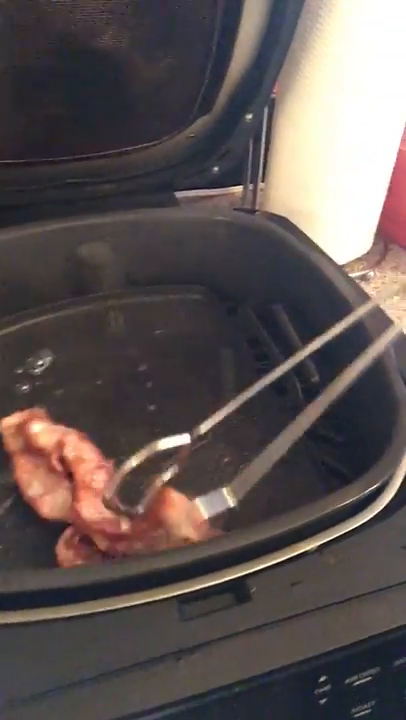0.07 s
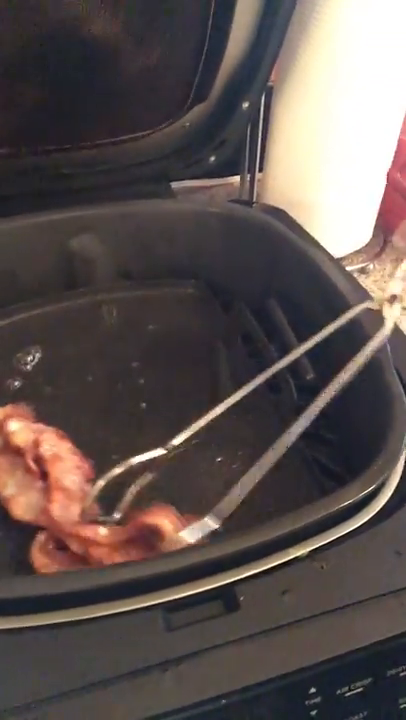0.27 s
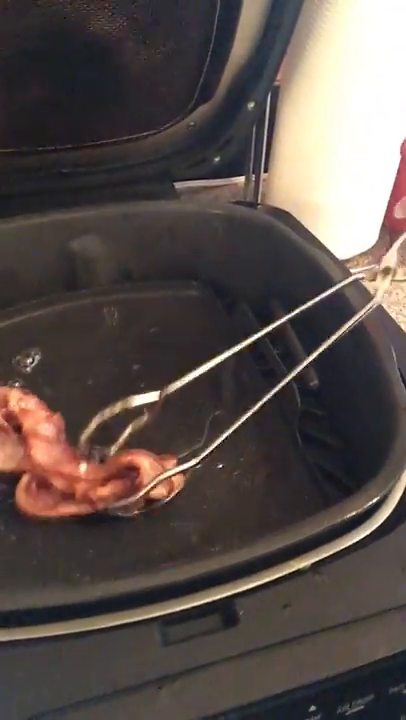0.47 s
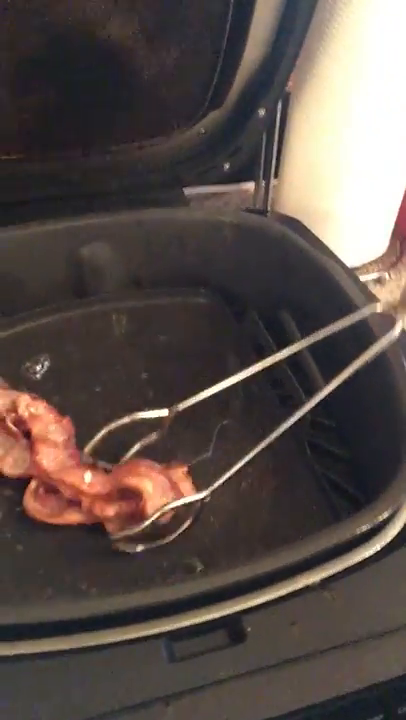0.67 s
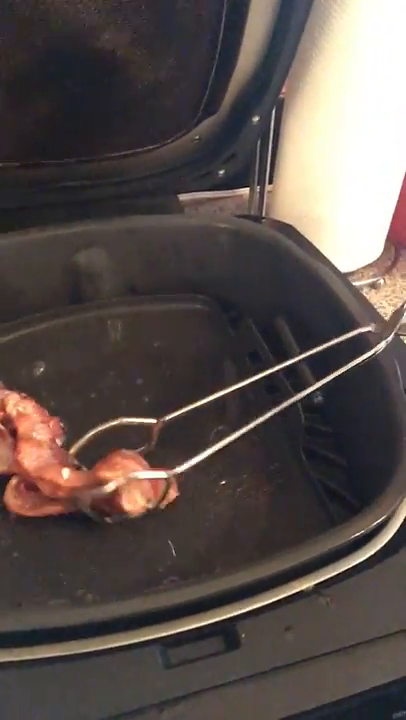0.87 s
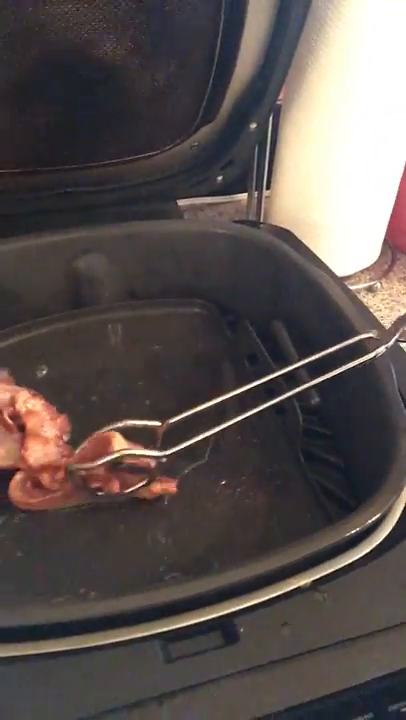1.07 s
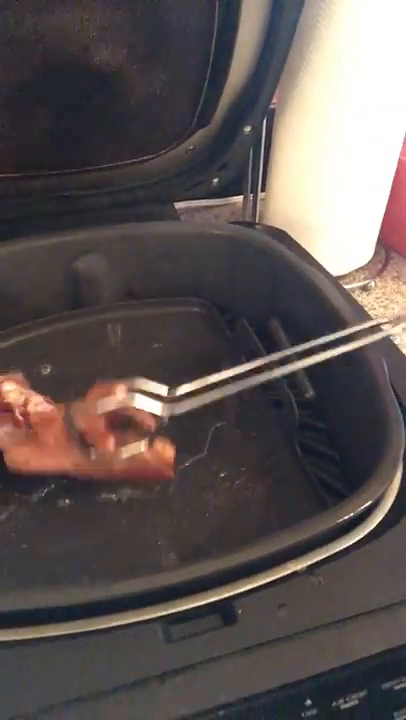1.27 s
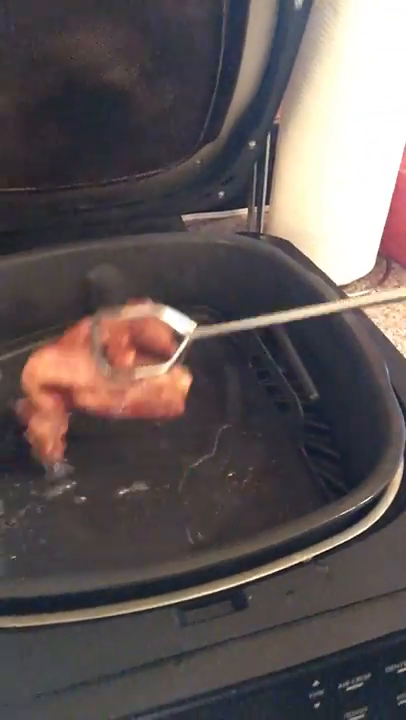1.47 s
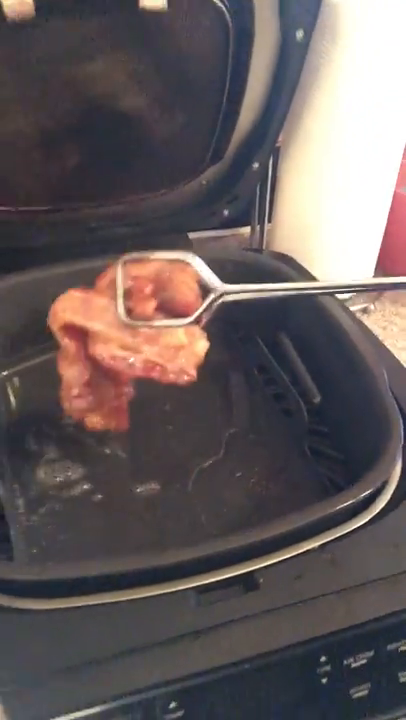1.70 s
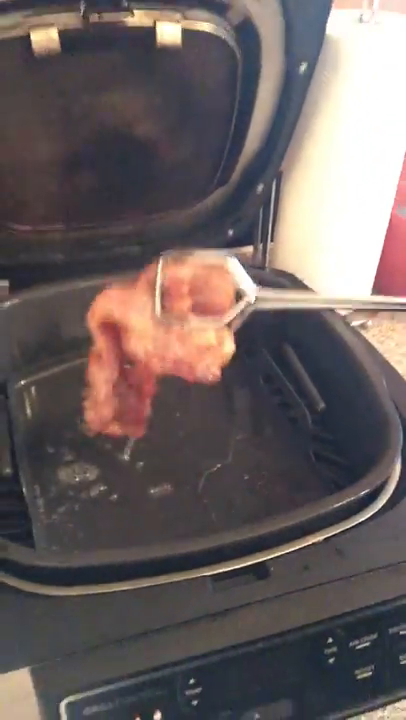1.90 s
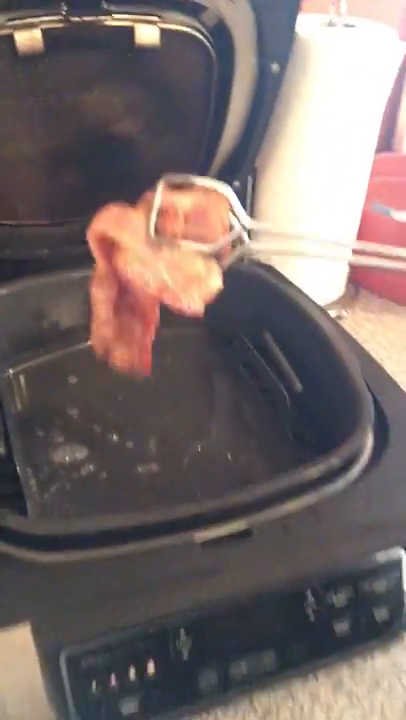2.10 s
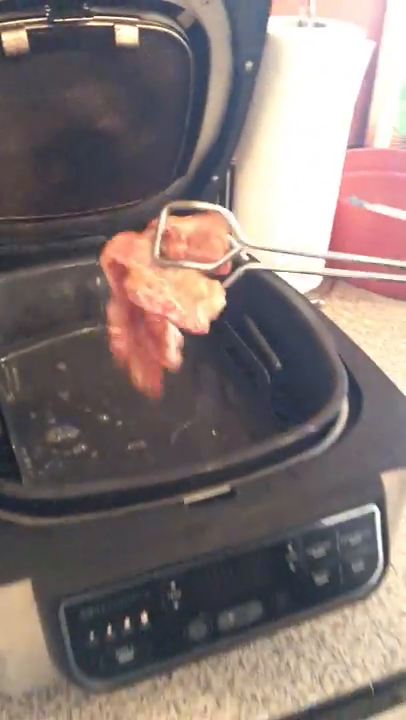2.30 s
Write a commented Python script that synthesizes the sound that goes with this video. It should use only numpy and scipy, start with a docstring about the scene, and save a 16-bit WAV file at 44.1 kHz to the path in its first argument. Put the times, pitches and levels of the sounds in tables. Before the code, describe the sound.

Close up in a small kitchen, steel tongs hit a pan with a ringing clack and scrape under bacon. A cluster of small fat pops follows, then the soft sizzle dies down over a low hum.

```python
"""A small kitchen, with a low hum and a faint sizzle from an electric griddle.
Steel tongs knock on the coated pan and bounce, ringing its modes while their sprung arms shudder.
The tips scrape along under a rasher of bacon in tiny slips that excite the pan's resonances.
Blisters of hot fat pop, spit and whistle as the bacon is gripped and lifted; a soft bump follows."""
import sys
import numpy as np
from scipy import signal
from scipy.fft import rfft, irfft, next_fast_len
from scipy.io import wavfile
from scipy.ndimage import map_coordinates

SR = 44100
rng = np.random.default_rng(int(sys.argv[2]) if len(sys.argv) > 2 else 0)


def put_to_file(sound):
    """Save the sound as 16-bit audio at rate SR, in the file named by the first command-line argument."""
    columns = np.atleast_2d(sound).T  # one column per channel
    safe = np.clip(columns, -1, 1)
    whole_steps = np.round(safe * 32767)
    wavfile.write(sys.argv[1], SR, whole_steps.astype(np.int16))


N = 108045
T = np.arange(N) / SR


def amp(db):
    """Decibels to gain."""
    return 10 ** (np.asarray(db) / 20)


def unit(x):
    """Scale x to rms 1."""
    return x / np.sqrt(np.mean(x ** 2) + 1e-20)


def along(points, hz):
    """Read a curve of (Hz, value) points on a log frequency axis."""
    freqs, values = np.transpose(points)
    return np.interp(np.log(hz + 1), np.log(freqs + 1), values)


def levels(rows):
    """A gain envelope for each dB column, silent outside the table's times."""
    times, *columns = np.transpose(rows)
    return [amp(np.interp(T, times, db)) * (T >= times[0]) * (T <= times[-1]) for db in columns]


def wobble(per_s):
    """A smooth random curve with per_s knots a second."""
    return map_coordinates(rng.standard_normal(int(N * per_s / SR) + 4), [T * per_s])


def fade(t, t60):
    """Free decay, 60 dB down after t60 seconds."""
    return np.exp(-np.log(1000) * t / t60)


def filtered(x, response):
    """Filter x by a gain given as a function of Hz."""
    size = next_fast_len(len(x) + 8192)
    return irfft(rfft(x, size) * response(np.fft.rfftfreq(size, 1 / SR)), size)[:len(x)]


def coloured(x, spectrum):
    """Shape x with an EQ curve of (Hz, dB) points, at rms 1."""
    return unit(filtered(x, lambda hz: amp(along(spectrum, hz))))


def add(track, start, sound):
    """Mix a sound into the track, start seconds in."""
    part = track[round(start * SR):][:len(sound)]
    part += sound[:len(part)]


def dying(noise, t60s):
    """Let each frequency of the noise die at its own speed."""
    hz, t, bins = signal.stft(noise, SR, nperseg=128)
    return signal.istft(bins * fade(t, along(t60s, hz)[:, None]), SR)[1][:len(noise)]


def grains(per_s, spread_db=1):
    """Random impulses of uneven size."""
    size = amp(spread_db * np.minimum(rng.exponential(size=N), 4))
    return (rng.random(N) < per_s / SR) * size * rng.choice([-1, 1], N)


def resonate(x, peaks):
    """Pass x through parallel resonances of alternating polarity, at rms 1."""
    def response(f):
        return sum((-1) ** k * amp(db) * 1j * f * width / (hz * hz - f * f + 1j * f * width)
                   for k, (hz, width, db) in enumerate(peaks))
    return unit(filtered(x, response))


def burst(centre_hz, octaves, t60, snap=0, skirt=0):
    """A dying rattle in one band; snap adds an opening click, skirt lets treble through."""
    def band(hz):
        bell = np.exp(-.5 * (np.log2((hz + 1) / centre_hz) / octaves) ** 2)
        return bell + skirt * hz / (hz + centre_hz)
    t = T[:SR // 4]
    rattle = rng.choice([-1., 1.], len(t)) * fade(t, t60)
    rattle[0] += snap
    band_rms = np.sqrt(np.mean(band(np.linspace(0, SR / 2, len(t))) ** 2))
    return filtered(rattle, band) / band_rms


def room_tone():
    """The kitchen's air, slowly sinking, and a low wavering hum."""
    # Each row: time in seconds, level in dB.
    air_level = [(0, -53), (1.2, -55), (1.8, -56.5), (2.45, -59)]
    # The air's colour. Each row: frequency in Hz, relative level in dB.
    air_spectrum = [(25, -18), (45, -5), (70, 0), (98, -3), (180, -4), (400, -3), (560, -13.5),
                    (1100, -8.5), (1330, -8.5), (1520, -2.5), (1750, -10), (3000, -16.5), (7000, -30.5)]
    # The hum's tones. Each row: pitch in Hz, relative level in dB.
    hum_tones = [(75.4, -76.5), (183.0, -65.5), (382.2, -76.5)]
    air = coloured(rng.standard_normal(N), air_spectrum) * amp(np.interp(T, *np.transpose(air_level)))
    hum, trim_db, waver_db = np.zeros(N), -1.5, 3
    for hz, db in hum_tones:
        rms = amp(db + trim_db + waver_db * wobble(per_s=8.8))
        hum += rms * np.sqrt(2) * np.sin(2 * np.pi * hz * T + wobble(per_s=5.9))
    return air + hum


def kitchen_reverb(send):
    """The small room answers with a diffuse tail that lasts longest in the bass."""
    # Each row: frequency in Hz, t60 in seconds.
    decay = [(200, 1), (1500, 0.45), (5000, 0.19), (12000, 0.37)]
    t, build_s = T[:SR // 2], 0.0042
    tail = dying(rng.standard_normal(len(t)), decay) * (1 - np.exp(-t / build_s))
    return signal.fftconvolve(send, tail / np.linalg.norm(tail))[:N]


def sizzle():
    """Thousands of tiny ticks a second blur into a fine bed of frying."""
    # Each row: time in seconds, level in dB.
    level = [(0, -57.5), (.1, -56.5), (.13, -55.5), (.3, -54.5), (.8, -58.5), (1.08, -51.5), (1.35, -56),
             (1.8, -61.5), (2.45, -69)]
    # Each row: frequency in Hz, relative level in dB.
    spectrum = [(1500, -13), (2500, 0.5), (4000, 3), (7000, -1), (9200, -2), (10500, -4), (12000, -3.5),
                (15500, -7.5)]
    return coloured(grains(per_s=7000), spectrum) * amp(np.interp(T, *np.transpose(level)))


def bumps():
    """Soft, dull knocks of the griddle and its surroundings."""
    # Each row: start in seconds, level in dB, centre in Hz, width in octaves, t60 in seconds.
    knocks = [(.36, -34.5, 774, 0.07, .22), (.516, -38.5, 336, 0.16, 0.15),
              (0.8343, -35, 1850, 0.17, 0.065), (2.4049, -49, 1660, 1, 0.15), (2.426, -49, 344, 0.28, .2)]
    out = np.zeros(N)
    for start, db, hz, octaves, t60 in knocks:
        add(out, start, amp(db) * burst(hz, octaves, t60))
    return out


def fat_sputter():
    """Fat pressed on the hot pan spits finely and dies down."""
    # Each row: start in seconds, level in dB, t60 in seconds.
    sputters = [(.114, -45, 0.36), (.923, -57, 0.6)]
    # The spray's resonances. Each row: centre in Hz, width in Hz, relative level in dB.
    peaks = [(6340, 1500, -2), (9500, 550, 2), (11800, 710, -4), (14000, 1800, -1)]
    out, t = np.zeros(N), T[:SR // 2]
    for start, db, t60 in sputters:
        spray = resonate(grains(per_s=1900, spread_db=4), peaks)[:len(t)]
        add(out, start, amp(db) * fade(t, t60) * spray)
    return out


def fat_pops():
    """Blisters of fat burst with a snap, and the grip clicks wetly."""
    # Each row: start in seconds, level in dB, centre in Hz, width in octaves, t60 in seconds.
    pops = [(0.1141, -32.5, 8100, 1.5, 0.033), (0.1174, -34, 6500, 1.9, 0.035),
            (0.1872, -32.5, 2980, 1.2, 0.025), (0.5915, -29, 3520, 0.84, 0.015),
            (.751, -47.5, 7100, .7, 0.023), (0.9228, -31.5, 4030, 0.69, 0.023),
            (0.9275, -37.5, 3940, 0.86, .03), (0.9756, -43, 4000, 1.3, 0.035),
            (0.984, -41.5, 3930, 1.8, 0.053), (1.009, -40, 2900, 0.69, .04),
            (1.035, -37.5, 3030, 1.4, 0.016), (1.0372, -33, 2530, 1.4, 0.019), (1.066, -44, 5500, 1, .015),
            (1.083, -32.5, 6000, 2.1, 0.032), (1.093, -36, 3000, 1.1, .03), (1.097, -28, 2740, 0.68, 0.03),
            (1.105, -34, 2500, 0.39, 0.035), (1.2522, -38, 4500, 1.1, 0.028), (1.33, -53, 4200, 1.1, .02)]
    out = np.zeros(N)
    for start, db, hz, octaves, t60 in pops:
        add(out, start, amp(db) * burst(hz, octaves, t60, snap=amp(11), skirt=amp(-39.5)))
    return out


def steam_whistles():
    """Steam escapes the fat in thin, rising, unsteady chirps."""
    # Each row: start and length in seconds, first and last pitch in Hz, level in dB.
    whistles = [(0.117, 0.021, 5200, 7000, -44), (0.93, 0.019, 7170, 7430, -52),
                (0.948, 0.015, 9000, 10100, -48)]
    out, waver = np.zeros(N), .07
    for start, length, first_hz, last_hz, db in whistles:
        progress = np.linspace(0, 1, int(length * SR))
        glide_hz = first_hz + (last_hz - first_hz) * progress
        hz = glide_hz * (1 + waver * wobble(per_s=2800)[:len(progress)])
        add(out, start, amp(db) * np.sin(np.pi * progress) * np.sin(2 * np.pi * np.cumsum(hz) / SR))
    return out


def tong_scrape():
    """Tiny slips of the tips excite the pan in a long stroke and a short nudge; grit rides on top."""
    # The two gestures. Each row: time in seconds, relative levels of the low and high layers in dB.
    stroke = [(0.362, -38, -34.5), (0.368, -45, -38), (0.398, -40.5, -52), (0.41, -42, -39),
              (0.474, -39.5, -35.5), (0.494, -40.5, -30.5), (0.504, -41.5, -32.5), (0.522, -35.5, -36),
              (0.542, -39, -44), (0.586, -47.5, -49.5), (0.592, -49.5, -43), (0.602, -52, -50),
              (0.622, -40.5, -50), (0.65, -40, -43), (0.674, -41, -48.5), (0.748, -56.5, -63),
              (0.78, -70, -60)]
    nudge = [(.79, -60, -63), (.822, -49.5, -52), (.85, -43, -53), (.874, -59, -58), (.892, -45.5, -59),
             (.925, -53, -59)]
    # Resonances under the tips. Each row: centre in Hz, width in Hz, relative level in dB.
    low_peaks = [(377, 120, -17.5), (620, 87, -12), (768, 27, -7), (952, 26, 2), (1232, 24, -4),
                 (1358, 31, -5)]
    high_peaks = [(1763, 102, 3.5), (1956, 133, 0.5), (2184, 43, -1), (2496, 54, -3.5), (2850, 90, -15),
                  (3110, 70, -9)]
    grit_peaks = [(3320, 230, 0), (3950, 200, 1), (4450, 180, -4), (5440, 480, -4.5)]
    low_gain, high_gain = np.add(levels(stroke), levels(nudge))
    slips = grains(per_s=1300)
    low_rub = amp(-1) * resonate(slips, low_peaks)
    high_rub = amp(0.5) * resonate(slips, high_peaks)
    grit = amp(-14.5) * resonate(grains(per_s=780), grit_peaks)
    return low_gain * low_rub + high_gain * (high_rub + grit)


def arm_shudder():
    """The long sprung arms of the tongs shudder at a low pitch after the bounce."""
    # Each row: start in seconds, pitch in Hz, level in dB, t60 in seconds.
    modes = [(.288, 62, -46.5, 1.12), (.284, 200, -39.5, 0.62)]
    out, t = np.zeros(N), T[:SR]
    for start, hz, db, t60 in modes:
        attack = 1 - np.exp(-t * hz)
        add(out, start, amp(db) * np.sin(2 * np.pi * hz * t) * fade(t, t60) * attack)
    return out


def tong_taps():
    """Each contact rings the pan over a dense clack; soft ones are duller, resting tongs damp the ring."""
    # Each row: start in seconds, gain in dB, low-pass cutoff in Hz, share of the free ring time.
    contacts = [(0.209, -9.5, 9400, 0.81), (0.2266, -19, 2170, .7), (.2798, -24, 4500, 0.66),
                (.2885, -18.5, 1310, 0.45), (0.2944, -27.5, 1760, 0.79), (.3585, -31.5, 4500, 0.33),
                (0.4243, -34, 4960, 0.35), (0.8339, -38.5, 2600, 0.46)]
    # Each row: pitch in Hz, relative level in dB, free t60 in seconds.
    pan_modes = [(345, -21, .28), (528, -27, .25), (800, -15, .16), (912, -8.5, .12), (1165, -8, .13),
                 (1300, -9, .09), (1405, -2, .1), (1528, -3, .11), (1642, -2, .11), (1772, -12, .13),
                 (2010, 0, .11), (2102, -6, .11), (2316, -6, .12), (2405, -7, .11), (2825, -6, .06),
                 (3338, -4, .055), (3740, -6, .045), (4440, -8, .045), (4980, -11, .045)]
    # The clack of pan and housing. Each row: frequency in Hz, relative level in dB.
    clack_spectrum = [(100, -42), (450, -22.5), (850, -8), (1400, -4), (2300, -5), (3400, -1.5), (4800, -7),
                      (6500, -13.5), (9000, -16.5), (15500, -19)]
    # Each row: frequency in Hz, t60 in seconds.
    clack_decay = [(300, 0.58), (1000, 0.14), (2000, 0.099), (3500, 0.065), (10000, 0.076)]
    ring_db, clack_db, attack_s = -3.5, -5, 0.00045
    out, t = np.zeros(N), T[:SR // 2]
    for start, db, cutoff_hz, ring_share in contacts:
        ring = np.zeros(len(t))
        for hz, mode_db, t60 in pan_modes:
            envelope = amp(mode_db + rng.normal(0, 1)) * fade(t, t60 * ring_share)
            ring += envelope * np.sin(2 * np.pi * (hz * t + rng.random()))
        clack = dying(coloured(rng.standard_normal(len(t)), clack_spectrum), clack_decay)
        blow = (amp(ring_db) * ring + amp(clack_db) * clack) * (1 - np.exp(-t / attack_s))
        add(out, start, amp(db) * signal.lfilter(*signal.butter(2, cutoff_hz, fs=SR), blow))
    return out


def scene():
    """A close mono mix of tongs and frying; only the taps and the spitting fat feed the reverb."""
    taps = tong_taps()
    fat = fat_pops() + steam_whistles() + fat_sputter()
    reverb = kitchen_reverb(amp(-15.5) * taps + amp(-9.5) * fat)
    return (taps + fat + reverb + arm_shudder() + tong_scrape() + bumps() + sizzle() + room_tone())[None]


def record(dry):
    """The microphone adds hiss; the recorder rounds off the loudest peaks and cuts the very top."""
    # Each row: frequency in Hz, relative level in dB.
    hiss_spectrum = [(1500, -18.5), (3000, -7.5), (5500, -6), (9300, 0),
                     (10500, -4), (12000, 2.5), (15500, -2.5)]
    hiss_db, ceiling_db, top_hz = -57.5, -2.5, 15800
    noisy = dry[0] + amp(hiss_db) * coloured(rng.standard_normal(N), hiss_spectrum)
    rounded = noisy / (1 + (noisy / amp(ceiling_db)) ** 4) ** .25
    return filtered(rounded, lambda hz: hz < top_hz)[None]


dry = scene()
out = record(dry)
put_to_file(out)
```